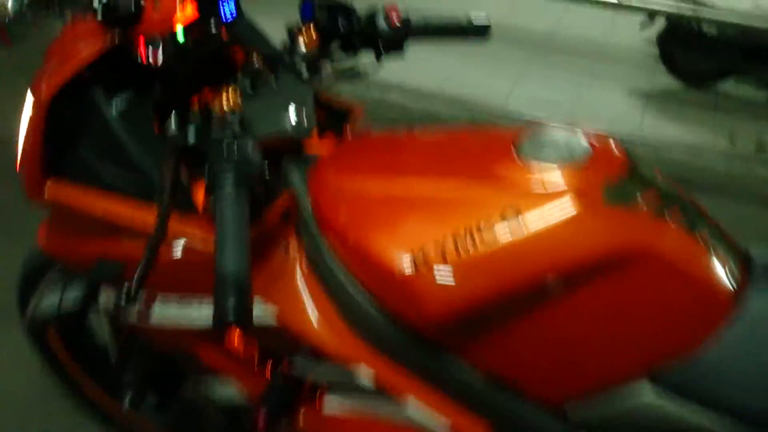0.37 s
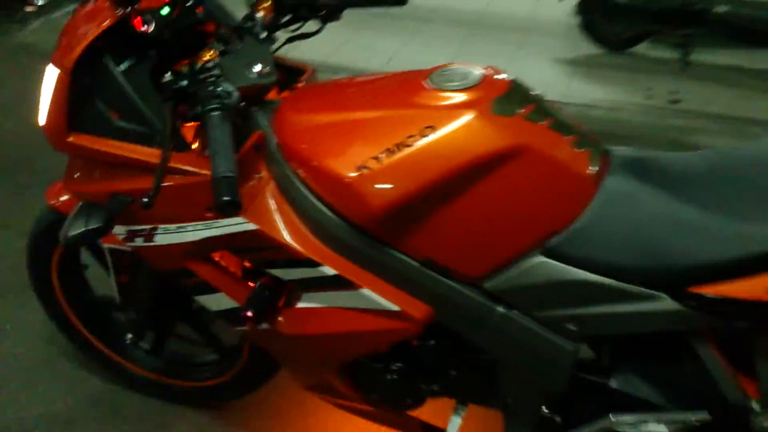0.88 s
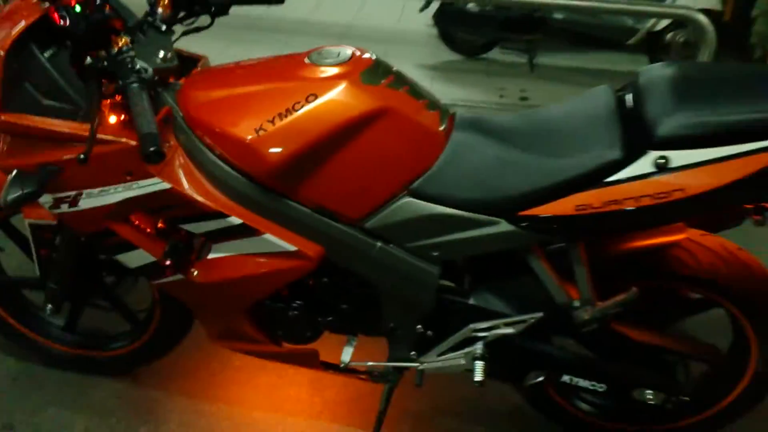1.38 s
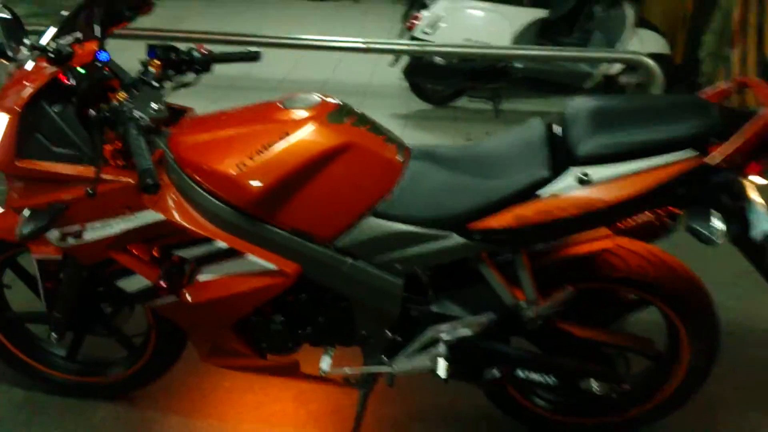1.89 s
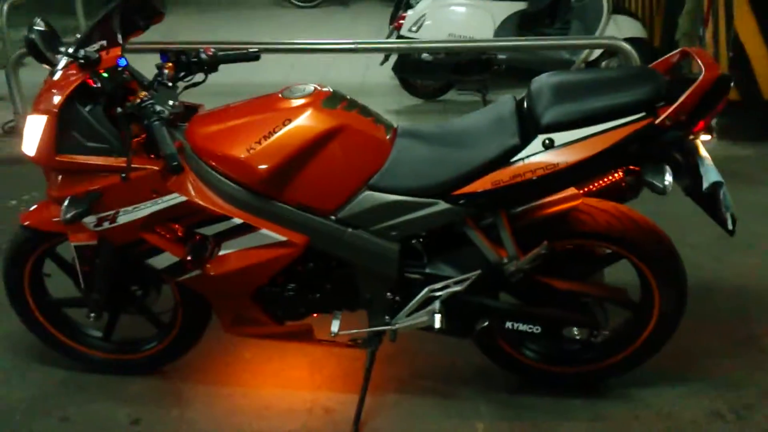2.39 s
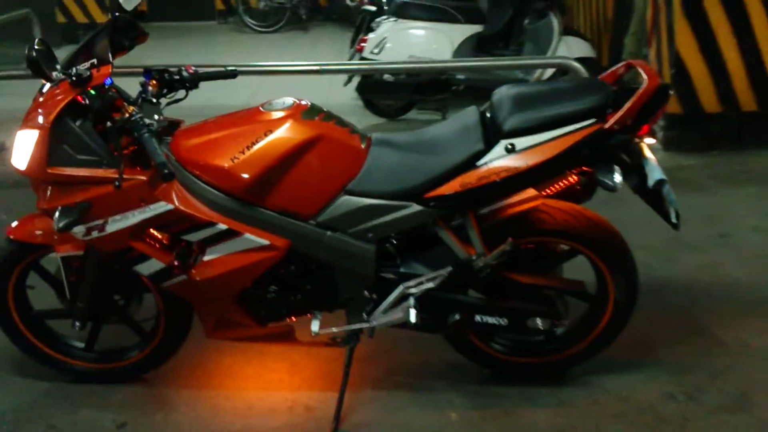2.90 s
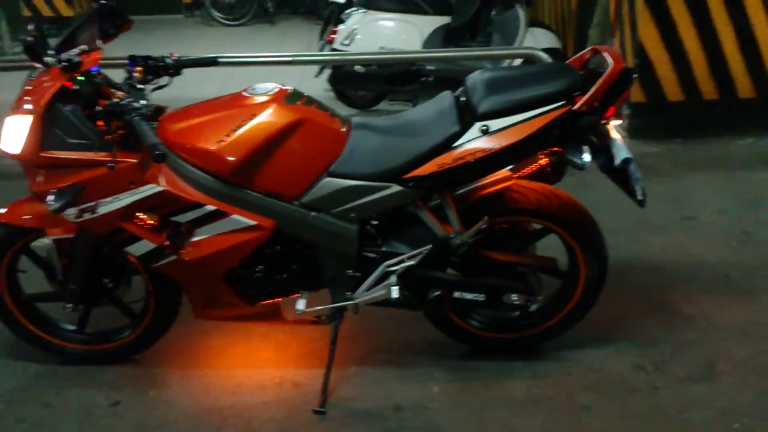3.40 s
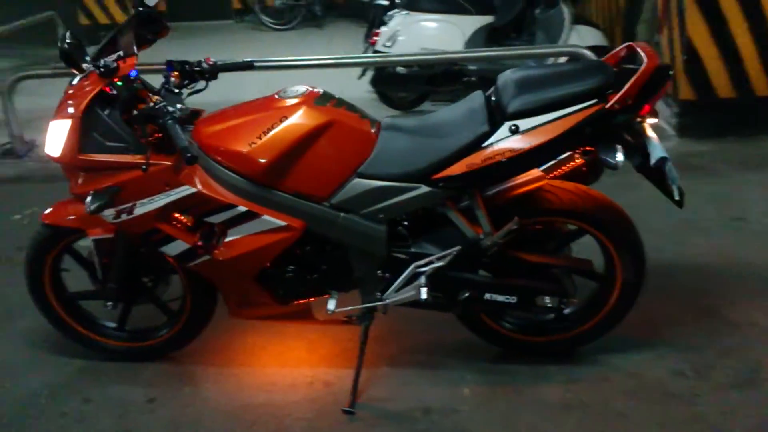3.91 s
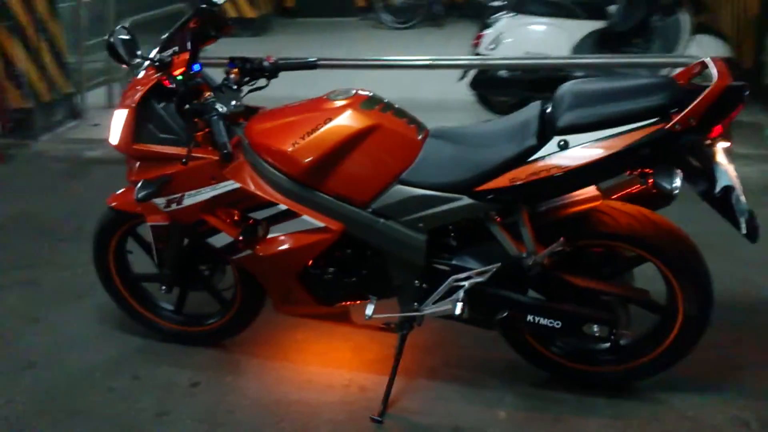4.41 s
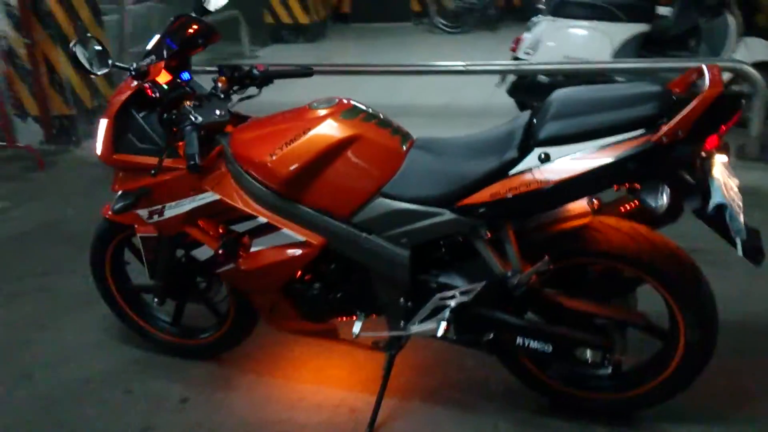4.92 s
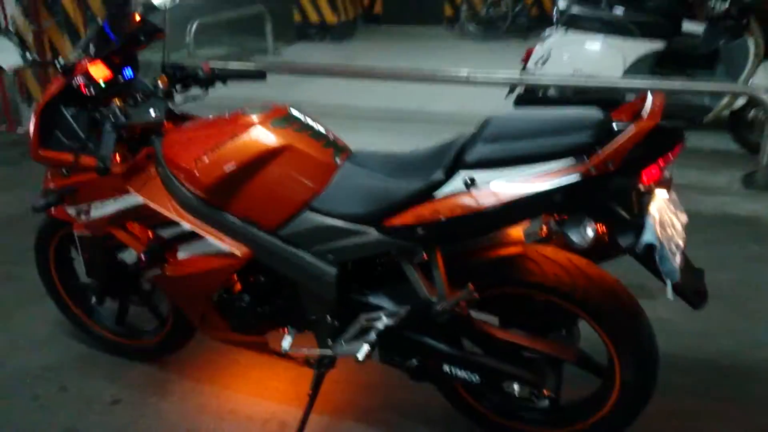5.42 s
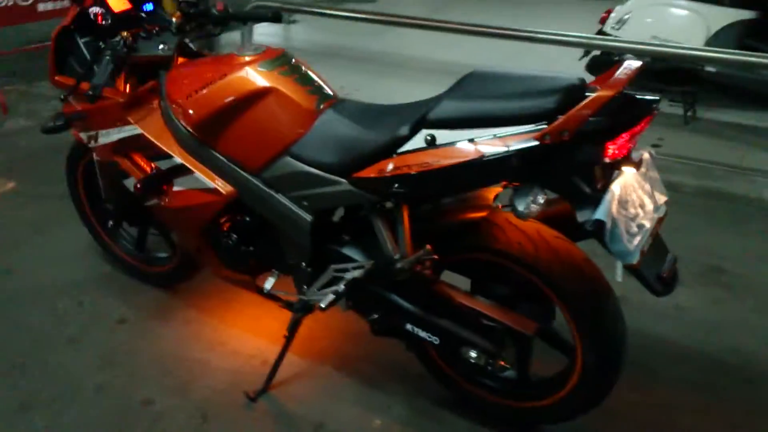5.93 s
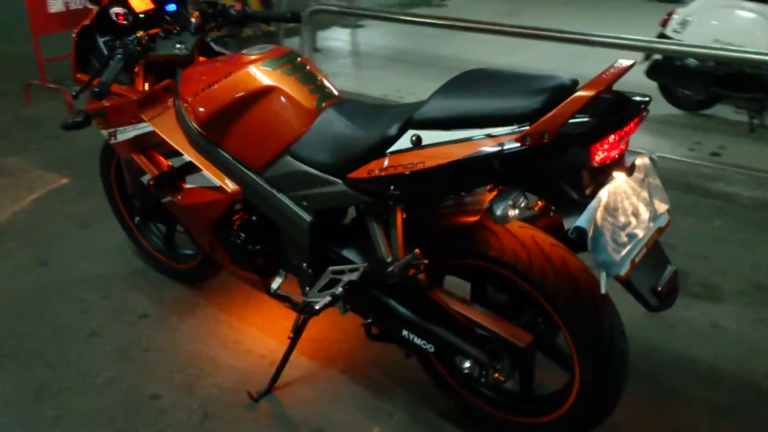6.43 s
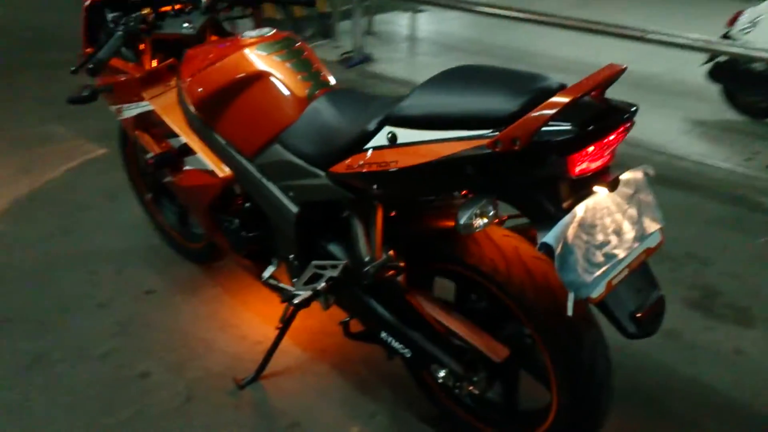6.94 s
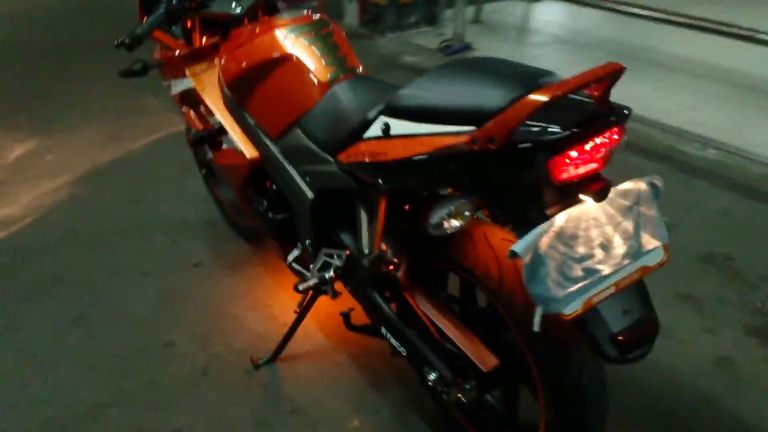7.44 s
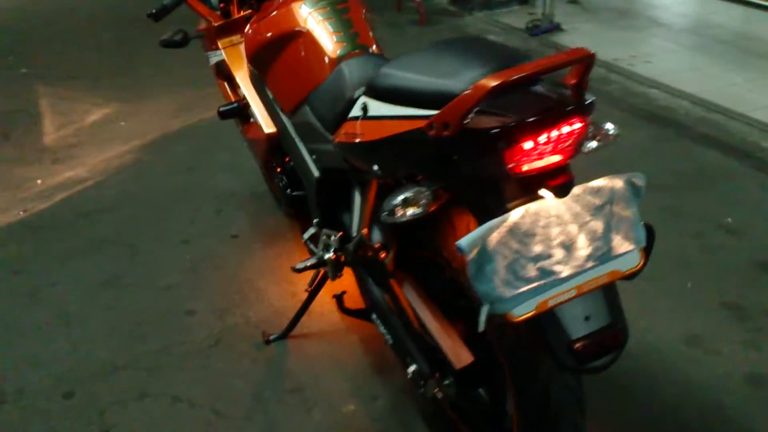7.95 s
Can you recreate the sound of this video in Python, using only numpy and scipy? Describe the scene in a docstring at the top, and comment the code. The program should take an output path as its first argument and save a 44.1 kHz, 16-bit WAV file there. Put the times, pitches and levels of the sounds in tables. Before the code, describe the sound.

Continuous puttering idle of a small four-stroke motorbike, already running at the start and still running at the end. The speed wavers slightly. Low drumming pipe and silencer tones mix with dry mechanical clatter, faint whine and narrow metallic ringing. Close floor and wall echoes thicken the beats. The handheld stereo phone microphone is near, slightly brighter and louder on the left, with rounded deep bass.

```python
"""In a concrete parking bay, a small single-cylinder four-stroke idles while a phone walks round it.
Each firing pushes sets of decaying tones: the pipe's boom, the silencer's thump, its shell and chamber.
Floor, wall and bay throw the thump back, and a low noise rumbles under it.
Coloured noise, swelling at set places in each cycle, makes the clatter, ticks, spurts and hiss;
noise squeezed into narrow bands makes the whine, the hum and the ringing covers."""
import sys
import numpy as np
from scipy import signal
from scipy.fft import rfft, irfft, next_fast_len
from scipy.io import wavfile
from scipy.ndimage import uniform_filter1d

SR = 44100
rng = np.random.default_rng(int(sys.argv[2]) if len(sys.argv) > 2 else 0)


def amplitude_ratio(level_db):
    """Convert a level in decibels to the matching linear amplitude (field) ratio."""
    exponent = np.asarray(level_db, float) / 20
    return 10 ** exponent


def waveform_to_disk(signal):
    """Save audio, clipped to [-1, 1], as 16-bit WAV at the path in sys.argv[1]."""
    frames = np.transpose(np.atleast_2d(signal))
    scaled = np.clip(frames, -1, 1) * 32767
    samples = np.round(scaled).astype(np.int16)
    wavfile.write(sys.argv[1], SR, samples)


N = 356327
TIME = np.arange(N) / SR
SIZE = next_fast_len(N)
FREQ = np.maximum(np.arange(SIZE // 2 + 1) * SR / SIZE, 1)
BEFORE = SR // 2  # samples of running ahead of the start


def unit(x):
    """Scale to an rms (average strength) of 1."""
    return x / np.sqrt(np.mean(x ** 2))


def curves(table):
    """Join the points of each table column along time with straight lines."""
    s, *columns = np.transpose(table)
    return [np.interp(TIME, s, c) for c in columns]


def over_hz(table):
    """Read a (frequency, value) table at every frequency bin."""
    hz, value = np.transpose(table)
    return np.interp(np.log(FREQ), np.log(hz), value)


# the phone's walk: (time [s], distance to engine [m], distance to exhaust [m], nearness to the tail [0-1])
WALK_PATH = [(0, 1.08, 1.07, 0.18), (.5, 1.11, 1.13, 0), (1.0, 1.28, 1.28, 0.34), (1.5, 1.3, 1.23, 0),
             (1.85, 1.34, 1.36, 0), (2.25, 1.43, 1.13, 0.7), (2.6, 1.59, 1.04, 0), (3.1, 1.44, 1.26, 0.05),
             (3.7, 1.69, 1.12, 0), (4.4, 1.45, 1.44, 0.4), (5.0, 1.46, 1.2, .45), (5.6, 1.43, 1.03, .6),
             (6.3, 1.41, 1.5, .75), (7.2, 1.44, 1.39, 1), (8.08, 1.52, 1.16, 0.9)]


def walk():
    """Where the phone is: distance to the engine, distance to the exhaust, how far round to the tail."""
    return curves(WALK_PATH)


def spread(metres):
    """Sound loses 6 dB at each doubling of distance; gives the change in dB from 1 m."""
    return -20 * np.log10(np.maximum(metres, .1))


# idle speed hunting up and down: (time [s], firing rate [firings per s])
IDLE_SPEED = [(0.0, 14.882), (0.28, 15.483), (0.89, 15.337), (1.15, 14.898), (1.35, 15.613), (1.68, 14.934),
              (2.08, 15.64), (2.48, 14.867), (2.81, 14.906), (3.06, 16.128), (3.45, 14.854), (3.59, 15.39),
              (4.41, 15.188), (4.63, 15.75), (4.83, 15.023), (5.56, 15.438), (5.81, 15.035), (5.92, 15.593),
              (6.62, 15.211), (7.27, 15.637), (7.72, 14.99), (8.08, 15.867)]


def engine_speed():
    """The idle hunts: its firing rate drifts up and down."""
    return curves(IDLE_SPEED)[0]


def firings(cycle):
    """One firing at each whole cycle; gives even times, slightly uneven times and three chances each."""
    jitter_s = .0005
    index = np.flatnonzero(np.diff(np.floor(cycle)))
    # the engine is already running: seven earlier firings at the opening speed
    earlier = TIME[index[0]] - np.arange(7, 0, -1) / engine_speed()[0]
    even = np.r_[earlier, TIME[index]]
    charge = rng.standard_normal((len(even), 3))
    return even, even + jitter_s * charge[:, 2], charge


def push(at, size, width_s):
    """A smooth bell-shaped pressure push at each given time, beginning before the start."""
    place = np.clip(np.round(at * SR).astype(int).ravel() + BEFORE, 0, BEFORE + N - 1)
    reach = np.arange(-200, 201) / SR
    bell = np.exp(-.5 * (reach / width_s) ** 2)
    return np.convolve(np.bincount(place, size.ravel(), BEFORE + N), bell, "same")


def strike(force, modes):
    """A force sets each mode of a body ringing at its own pitch, and each dies away at its own rate."""
    rung = 0
    for hz, db, t60, sign in modes:
        pole = np.exp((2j * np.pi * hz - np.log(1000) / t60) / SR)
        rung = rung + sign * amplitude_ratio(db) * signal.lfilter([1], [1, -pole], force).imag
    return unit(rung[BEFORE:])


# the bike shades the pipe from the side, and two near echoes move with the walk:
# (time [s], direct share, floor lag [s], floor share, wall lag [s], wall share)
NEAR_ECHOES = [(0, 1.28, 0.0122, 0.41, 0.014, 0.37), (1.1, 1.02, 0.01212, 0.41, 0.015, 0.71),
               (1.9, 0.65, .0045, 0.45, 0.0182, 0.8), (3.2, 0.68, 0.00447, 0.53, 0.0176, 0.77),
               (4.4, 0.7, 0.0046, 0.51, 0.015, 0.32), (5.3, 0.75, 0.0069, 0.42, 0.0131, .6),
               (6.5, 1.13, 0.0077, 0.52, 0.015, 0.84), (8.08, 0.94, 0.0078, 0.36, 0.013, 0.88)]


def arrivals(fired, count=56):
    """Sound reaches the phone directly, off floor and wall, and by many scattered paths of the bay."""
    bay_t60_s, bay_db = .4, -10
    lag = np.sort(rng.uniform(0.01206, .2, count))
    chance = rng.standard_normal((len(fired), 2 * count))
    # the phone walks, so each return swells and fades over a few firings, with a little flutter of its own
    slow = unit(uniform_filter1d(chance[:, :count], size=9, axis=0))
    drift = slow + .35 * chance[:, count:]
    bay = amplitude_ratio(bay_db - 60 * lag / bay_t60_s) * drift
    direct, floor_s, floor, wall_s, wall = (np.interp(fired, TIME, c) for c in curves(NEAR_ECHOES))
    wall_s = wall_s + .0007 * drift[:, 0]  # the wall's path wanders longer and shorter
    lags = np.c_[0 * wall_s, floor_s, wall_s, np.tile(lag, (len(fired), 1))]
    return fired[:, None] + lags, np.c_[direct, floor, wall, bay]


def echoed_push(fired, charge):
    """Each firing pushes once directly and again with every echo; its charge scales them all."""
    scatter_db = .9
    at, size = arrivals(fired)
    return push(at - .0003, size * amplitude_ratio(scatter_db * charge[:, 1:2]), 0.00076)


def thump_level():
    """Thump level in dB: a fuller charge both speeds the engine and thumps louder."""
    level_db, db_per_hz, tail_db, idle_hz = -20.5, 1.5, 0.5, 15.3
    _, metres, tail = walk()
    surge = engine_speed() - idle_hz
    return level_db + spread(metres) + db_per_hz * surge + tail_db * tail


# modes of the silencer outlet:
# (frequency [Hz], drive level [dB], time to fall 60 dB [s], signed strength)
THUMP_MODES = [(230.4, 0, 0.0095, 0.64), (316.4, -23.5, 0.052, 0.54), (342, -20.5, 0.043, 0.84)]


def thump(force):
    """The silencer outlet gives a short low ring; its upper rings carry best in sight of the pipe."""
    upper_db = -6.5  # before the direct share
    direct_share = curves(NEAR_ECHOES)[0]
    low = strike(force, THUMP_MODES[:1])
    upper = amplitude_ratio(upper_db) * direct_share * strike(force, THUMP_MODES[1:])
    return amplitude_ratio(thump_level()) * (low + upper)


# modes of the exhaust pipe: (frequency [Hz], drive level [dB], time to fall 60 dB [s], signed strength)
PIPE_MODES = [(67.2, -1, 0.16, -1.283), (69.73, 4, 0.35, 0.51), (81.6, 2, 0.064, 0.51),
              (107.5, -35.5, 0.97, 0.63)]
# the boom swells and dips with the standing waves of the bay where the phone stands:
# (time [s], level [dB])
BOOM_LEVEL = [(0, -15.5), (.5, -15), (1.0, -15), (1.2, -18), (1.55, -13), (1.8, -16.5), (2.1, -14),
              (2.3, -14), (2.6, -19), (2.9, -16), (3.15, -19), (3.6, -17.5), (4.4, -17.5), (4.75, -16),
              (5.0, -16), (5.6, -14), (6.1, -16.5), (6.6, -14.5), (7.2, -17.5), (7.65, -13), (8.08, -18.5)]


def boom(fired, charge):
    """Each firing sets the gas in the pipe booming at its deep modes."""
    force = push(fired - .0002, amplitude_ratio(0.37 * charge[:, 0]), 0.0003)
    return amplitude_ratio(curves(BOOM_LEVEL)[0]) * strike(force, PIPE_MODES)


# modes of the silencer shell:
# (frequency [Hz], drive level [dB], time to fall 60 dB [s], signed strength)
SHELL_MODES = [(152, 2.2, 0.25, 0.66), (158.2, 6.3, 0.24, -1.36), (204.3, -7.5, 0.33, 1)]


def drum(force):
    """The silencer's shell drums under the same pushes, and fades as the phone goes round to the tail."""
    level_db, tail_db = -25.5, -15.5
    _, metres, tail = walk()
    return amplitude_ratio(level_db + spread(metres) + tail_db * tail) * strike(force, SHELL_MODES)


# ring of the silencer's end chamber, its pitch shifting with the angle:
# (time [s], pitch [Hz], level [dB])
CHAMBER_RING = [(0, 234, -29), (.5, 240, -25), (1.0, 241, -29.5), (1.15, 259.4, -26.5), (2.1, 265.2, -28.5),
                (2.8, 266, -30.5), (4.1, 269, -28), (4.8, 267, -23), (5.1, 264, -23.5), (5.25, 238, -24.5),
                (5.6, 235.3, -23), (6.4, 235.5, -28), (6.6, 262, -28.5), (7.2, 258, -26),
                (8.08, 255, -32.5)]


def chamber(fired, charge):
    """The end chamber rings as a single mode that follows a moving pitch."""
    t60_s = .21
    force = push(fired - .0003, amplitude_ratio(1.5 * charge[:, 1]), 0.00087)
    hz, db = curves(CHAMBER_RING)
    turn = np.exp(2j * np.pi * np.cumsum(hz) / SR)
    # slide the pitch down to 0 Hz, let it decay there, slide it back
    decay = np.exp(-np.log(1000) / t60_s / SR)
    rung = signal.lfilter([1], [1, -decay], force[BEFORE:] / turn) * turn
    return amplitude_ratio(db) * unit(rung.imag)


# likeness of the two microphone ports: (frequency [Hz], likeness [0-1])
PORT_LIKENESS = [(60, 1.0), (130, .98), (290, .95), (640, .8), (1410, .3), (3100, 0), (16000, 0)]


def noise(table):
    """Two-port noise of the given colour: alike in the bass, unrelated in the treble."""
    like = np.clip(over_hz(PORT_LIKENESS), 0, 1)
    mid, side = rfft(rng.standard_normal((2, SIZE)))
    pair = np.sqrt(1 + like) * mid + np.sqrt(1 - like) * side * np.array([[1], [-1]])
    return unit(irfft(pair * amplitude_ratio(over_hz(table)), SIZE)[:, :N])


def ring(hz, width):
    """Noise in a narrow resonance (width in Hz) that may move; the ports share the lower rings more."""
    coarse = np.arange(0, N + 64, 64) / SR
    chance = rng.standard_normal((2, 2, len(coarse)))
    decay = np.exp(-np.pi * width * coarse[1])
    mid, side = signal.lfilter([1], [1, -decay], chance[0] + 1j * chance[1])
    apart = np.clip(np.mean(hz) / 2400, 0, 1)
    carrier = np.exp(2j * np.pi * np.cumsum(hz * np.ones(N)) / SR)
    ports = [np.interp(TIME, coarse, mid + k * apart * side) * carrier for k in (1, -1)]
    return unit(np.array(ports).imag)


def burst(cycle, at, rise, fall, scatter_db):
    """Opens at a place in every cycle and dies away (place, rise and fall in cycles), each its own size."""
    since, count = (cycle - at) % 1, np.floor(cycle - at).astype(int) + 2
    size = amplitude_ratio(scatter_db * rng.standard_normal(200))[count]
    return size * (1 - np.exp(-since / rise)) * np.exp(-since / fall)


def patchy(x, patch_db):
    """Small patches of the spectrum swell and fade, as many loose parts ring in turn."""
    _, _, frames = signal.stft(x, nperseg=512)
    chance = rng.standard_normal(frames.shape[1:])
    across = uniform_filter1d(chance, size=3, axis=0)
    patches = unit(uniform_filter1d(across, size=6, axis=1))
    return unit(signal.istft(frames * amplitude_ratio(patch_db * patches), nperseg=512)[1][:, :N])


# colour of the clatter: (frequency [Hz], relative level [dB per Hz])
CLATTER_COLOUR = [(250, -27), (420, -0.5), (505, -16), (600, -10), (780, -16), (980, -18.5), (1160, -23.5),
                  (1400, -14.5), (2110, -15.5), (2530, -20), (3950, -21.5), (6170, -26), (10100, -20),
                  (12500, -25), (14500, -28.5), (16500, -33)]


def clatter(cycle):
    """Loose parts of the engine clatter steadily, with two swells in each cycle."""
    level_db = -34  # at 1 m, before the swells
    beat = 1 + 0.4 * burst(cycle, 0.31, 0.027, 0.052, 1.3) + 0.46 * burst(cycle, 0.82, .03, 0.21, 1.7)
    return amplitude_ratio(level_db) * patchy(noise(CLATTER_COLOUR), 1.42) * beat


# colour of the valve ticks: (frequency [Hz], relative level [dB per Hz])
TICK_COLOUR = [(1200, -26), (1600, -46), (1900, -7), (2150, 8), (2400, -12), (3500, -10.5), (6000, -38)]


def ticks(cycle):
    """The valves tick ahead of each firing and again from the firing on, louder toward the tail."""
    level_db, tail_db = -36.5, 6
    _, _, tail = walk()
    beat = burst(cycle, .85, 0.028, 0.079, 0.99) + 0.72 * burst(cycle, 1.0, .02, 0.061, 1.7)
    return amplitude_ratio(level_db + tail_db * tail) * noise(TICK_COLOUR) * beat


# colour of the bright gas spurt: (frequency [Hz], relative level [dB per Hz])
SPURT_COLOUR = [(7000, -44), (10000, -1), (12500, 3), (14500, 8), (16500, 6)]


def spurts(cycle):
    """A bright spurt as the valve opens, then a softer breath while the piston sweeps the cylinder."""
    level_db, tail_db = -34.5, 23
    breath_cycles = 0.5  # the breath closes this long after it opens
    _, _, tail = walk()
    gate = 1 / (1 + np.exp(((cycle + .015) % 1 - breath_cycles) / .03))
    breath = .1 + 0.48 * burst(cycle, .985, .04, 0.8, 1.5) * gate
    # two short clicks of the valve gear, best heard from the side
    clicks = burst(cycle, .175, .008, .025, 5.) + burst(cycle, .275, .008, .02, 5.)
    seats = .6 * np.clip(1 - tail, 0, 1) * clicks
    spurt = amplitude_ratio(tail_db * tail - 10) * burst(cycle, .003, .006, .03, 2.7)
    return amplitude_ratio(level_db) * noise(SPURT_COLOUR) * (spurt + breath + seats)


# colour of the gas hiss: (frequency [Hz], relative level [dB per Hz])
HISS_COLOUR = [(4000, -8), (6500, -11), (8500, 3), (10500, 6), (12000, 5.5), (13500, -14), (16500, -24)]


def hiss(cycle):
    """Gas hisses through and after each firing as patchy treble noise, with a short second puff."""
    level_db, tail_db = -35, -3
    _, _, tail = walk()
    beat = burst(cycle, 0.95, 0.019, 0.51, 1.3) + 0.44 * burst(cycle, 0.21, 0.018, 0.056, 4.6)
    return amplitude_ratio(level_db + tail_db * tail) * patchy(noise(HISS_COLOUR), 2.0) * beat


# case whine: (time [s], pitch [Hz], level at 1 m before its swells [dB])
CASE_WHINE = [(0.0, 1157, -45.5), (0.29, 1210, -40.5), (.8, 1194, -43), (1.6, 1125, -45.5),
              (1.96, 1180, -44.5), (2.7, 1133, -43), (2.99, 1208, -43.5), (3.6, 1165, -45.5),
              (4.07, 1144, -43.5), (4.8, 1170, -43), (5.4, 1174, -45), (6.3, 1183, -42.5),
              (7.38, 1208, -43.5), (8.08, 1178, -42)]


def whine(cycle):
    """The cases whine: a narrow band of noise with a wandering pitch, swelling once per cycle."""
    hz, db = curves(CASE_WHINE)
    return amplitude_ratio(db) * ring(hz, width=55) * (1 + 0.43 * burst(cycle, 0.7, 0.054, 0.14, 1.5))


# cover hum: (time [s], level [dB])
HUM_LEVEL = [(0, -46), (.8, -46.5), (1.5, -53.5), (2.3, -58), (3.2, -48.5), (3.7, -50), (4.2, -47),
             (5.2, -49.5), (6.0, -47.5), (6.5, -54), (6.9, -48), (7.5, -57), (8.08, -44)]


def hum():
    """A cover hums: a narrow band of noise around a fixed pitch."""
    return amplitude_ratio(curves(HUM_LEVEL)[0]) * ring(582, width=23.0)


# narrow rings of covers and fins, loudest while the phone faces them:
# (frequency [Hz], width [Hz], level before the swell [dB], loudest at [s], swell span [s])
COVER_RINGS = [(704, 6.7, -55.5, 0.89, 0.36), (836.5, 20, -52.5, 6.95, 0.38), (1620, 14, -54, 0.82, 0.91),
               (1930, 11, -52.5, 3.8, 0.84), (2118, 32, -53.5, 7.4, 0.83), (3465, 25, -58.5, 2.1, 2),
               (3890, 18, -62, 3.6, 7.5), (4316, 41, -55.5, 0.27, 1.5), (4920, 37, -60.5, 1.2, 15)]


def covers():
    """Covers and fins ring in narrow bands; each swells once above a level that stays."""
    total = 0
    for hz, width, db, loudest_s, span_s in COVER_RINGS:
        swell = 0.54 + np.exp(-((TIME - loudest_s) / span_s) ** 2)
        total = total + amplitude_ratio(db) * ring(hz, width) * swell
    return total


# colour of the low rumble: (frequency [Hz], relative level [dB per Hz])
RUMBLE_COLOUR = [(100, -43), (130, -37.5), (200, -1), (280, 11.5), (350, -8), (450, -20.5), (600, -49)]


def rumble():
    """Far returns of the bay blur into a rumble without beats, 12 dB under the thump's set level."""
    return amplitude_ratio(thump_level() - 12) * noise(RUMBLE_COLOUR)


def scene():
    """The engine's cycle count drives the exhaust and the beats of the engine body."""
    start_cycle = .31
    cycle = start_cycle + np.cumsum(engine_speed()) / SR
    even, fired, charge = firings(cycle)
    force = echoed_push(fired, charge)
    exhaust = thump(force) + boom(even, charge) + drum(force) + chamber(fired, charge)
    engine_m, _, _ = walk()
    body = clatter(cycle) + ticks(cycle) + spurts(cycle) + hiss(cycle) + whine(cycle)
    return exhaust + amplitude_ratio(spread(engine_m)) * body + hum() + covers() + rumble()


# colour of the two microphone ports: (frequency [Hz], left minus right [dB])
PORT_COLOUR = [(60, 4.5), (380, 4.5), (700, 5.3), (1290, 6), (2380, 2.9), (4400, 6.5), (7500, 8.9),
               (10500, 13), (12300, 7), (13800, 1.8), (16500, 3)]


def ports(dry):
    """The ports differ in colour, the left hears first; nothing passes from the top limit up."""
    lead_s, top_hz = .00012, 16000
    colour = amplitude_ratio(over_hz(PORT_COLOUR) / 2 * np.array([[1], [-1]]))
    delay = np.exp(-2j * np.pi * FREQ * np.array([[0], [lead_s]]))
    return irfft(rfft(dry, SIZE) * colour * delay * (FREQ < top_hz), SIZE)[:, :N]


def band_limit(x):
    """A steep low-pass at the top of the band."""
    return signal.sosfilt(signal.butter(12, 17030, fs=SR, output="sos"), x)


def record(dry):
    """The phone's two ports pick up the sound; it loses the deepest bass and its peaks are rounded."""
    wet = ports(dry)
    wet = signal.sosfilt(signal.butter(N=2, Wn=59.5, btype="high", fs=SR, output="sos"), wet)
    wet = 1.6 * np.tanh(wet / 1.6)
    return band_limit(wet)


dry = scene()
out = record(dry)
waveform_to_disk(out)
```